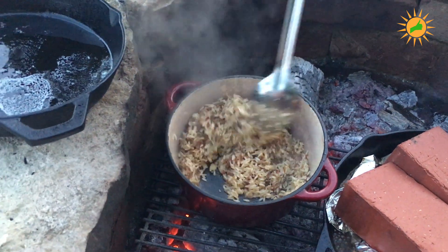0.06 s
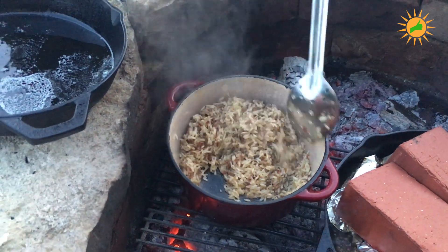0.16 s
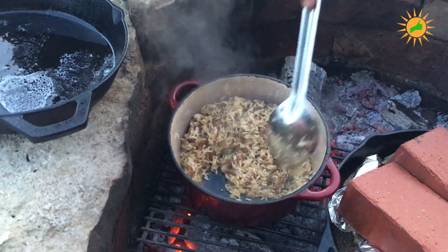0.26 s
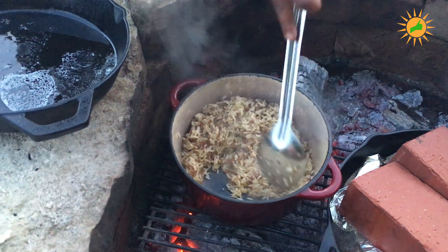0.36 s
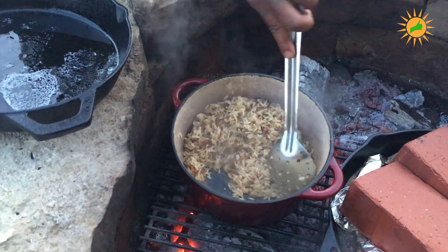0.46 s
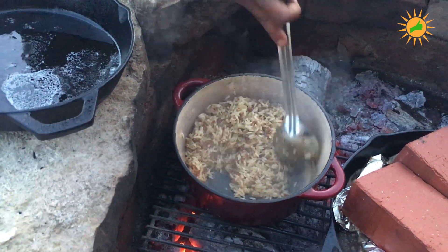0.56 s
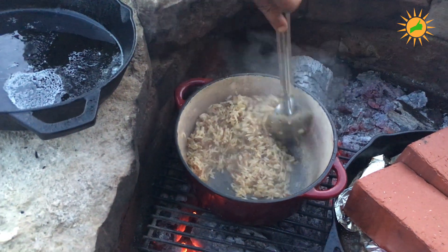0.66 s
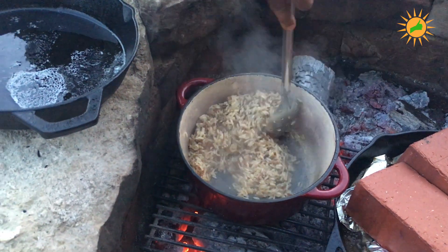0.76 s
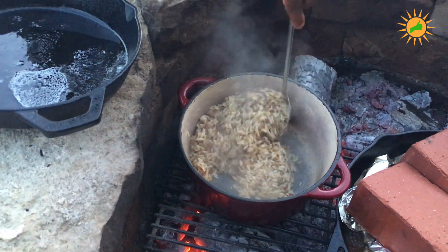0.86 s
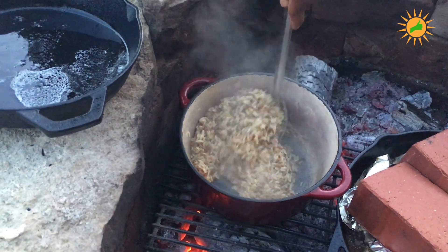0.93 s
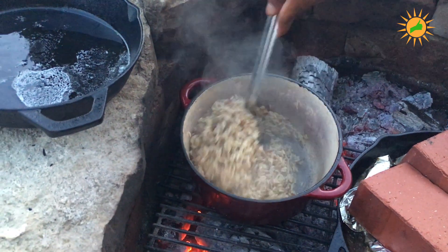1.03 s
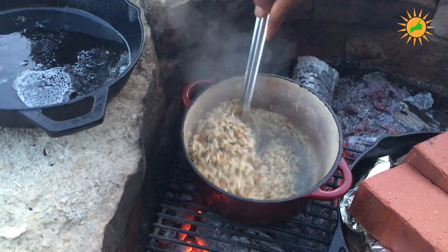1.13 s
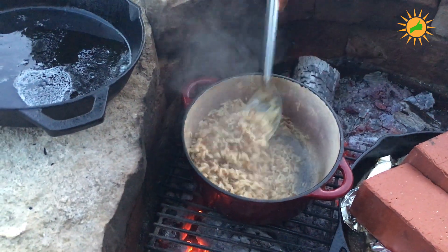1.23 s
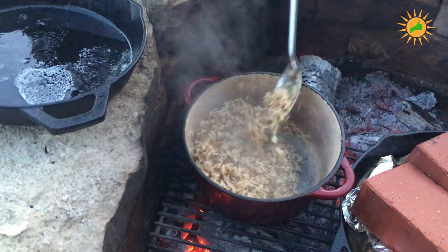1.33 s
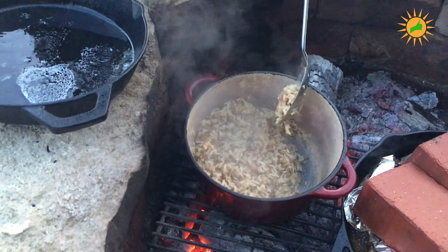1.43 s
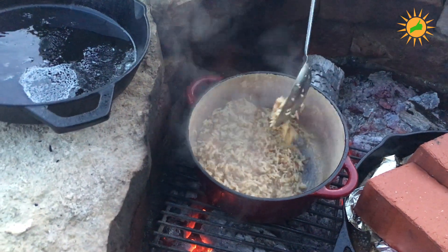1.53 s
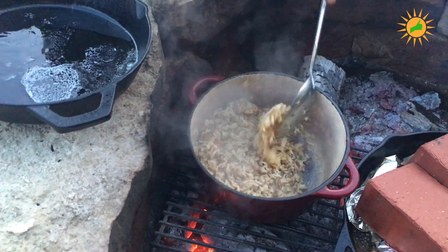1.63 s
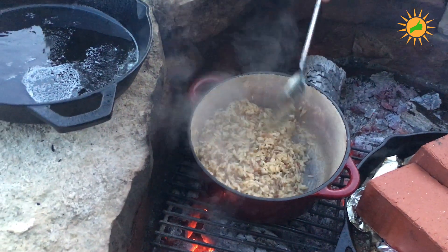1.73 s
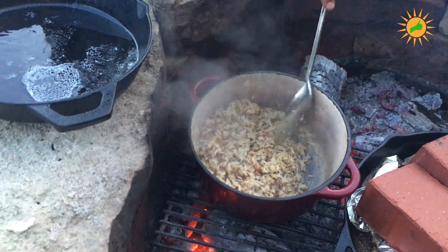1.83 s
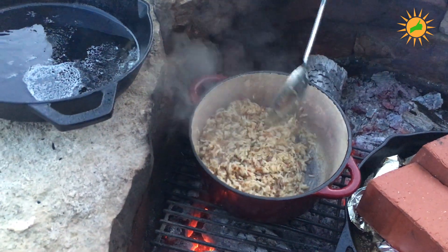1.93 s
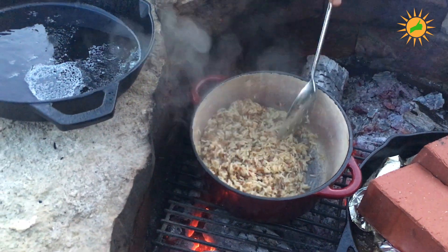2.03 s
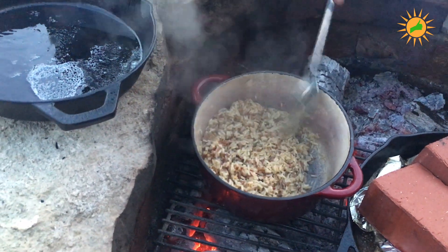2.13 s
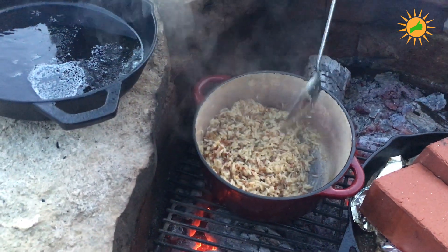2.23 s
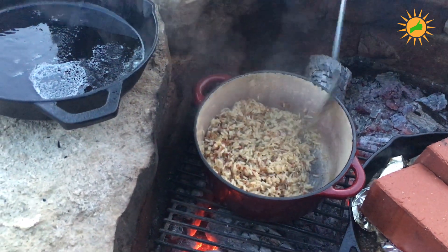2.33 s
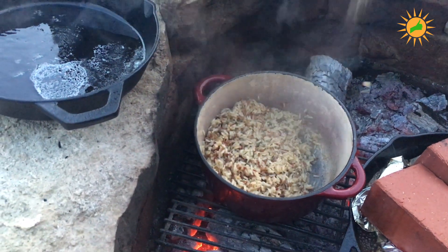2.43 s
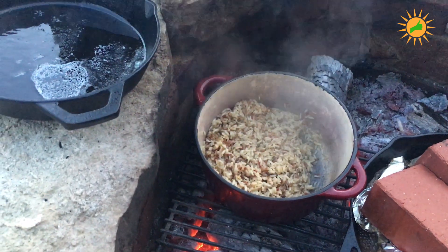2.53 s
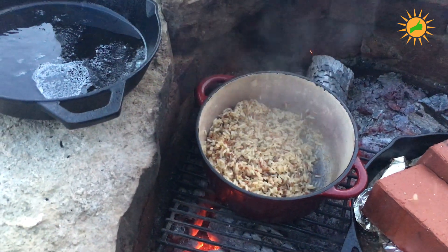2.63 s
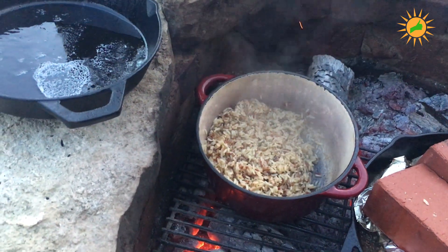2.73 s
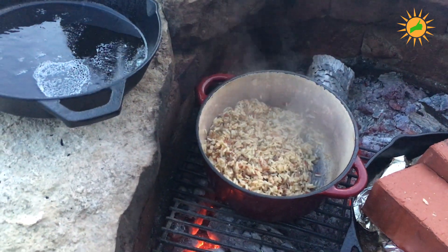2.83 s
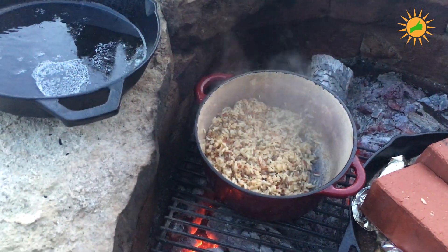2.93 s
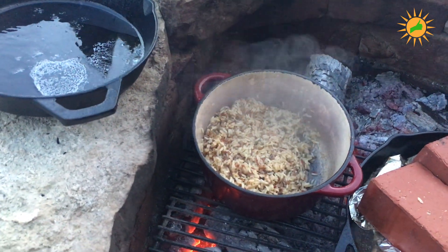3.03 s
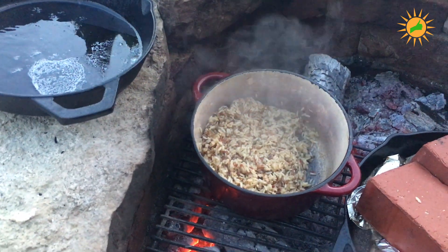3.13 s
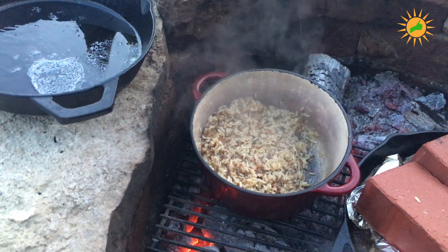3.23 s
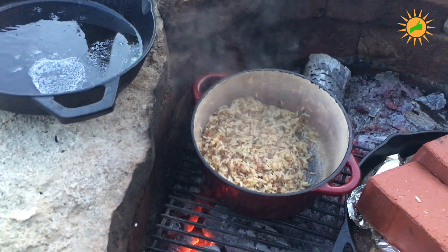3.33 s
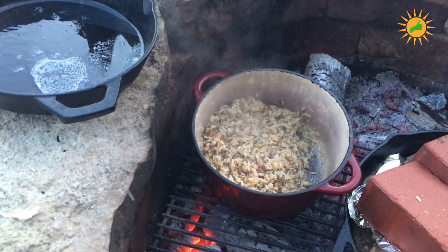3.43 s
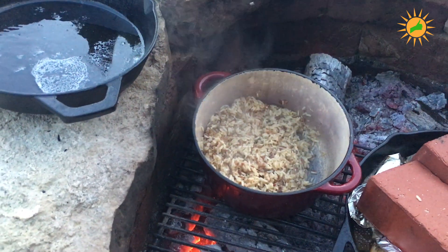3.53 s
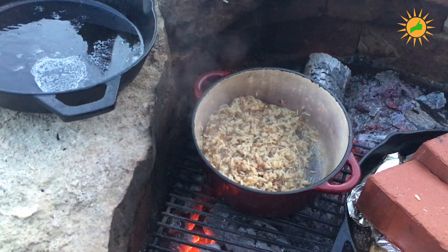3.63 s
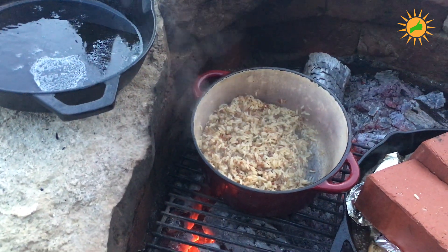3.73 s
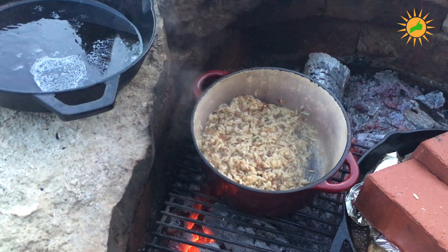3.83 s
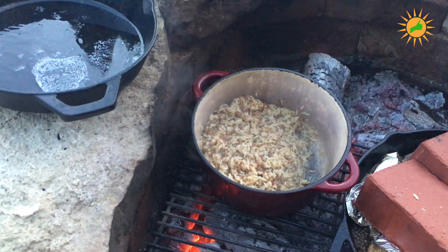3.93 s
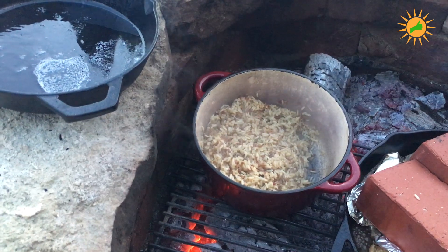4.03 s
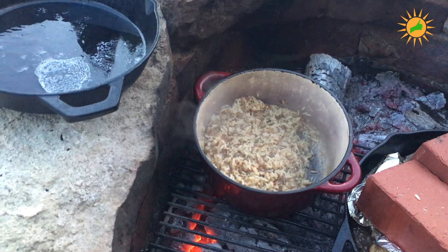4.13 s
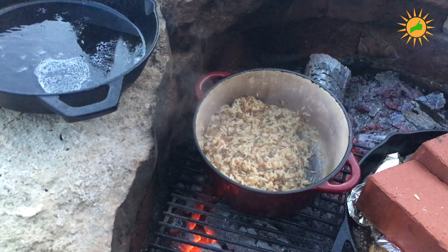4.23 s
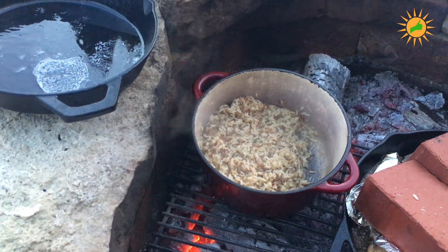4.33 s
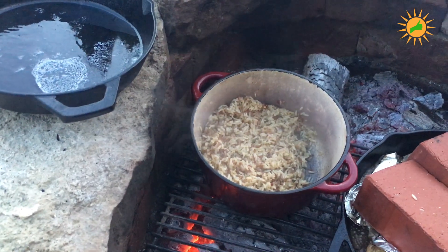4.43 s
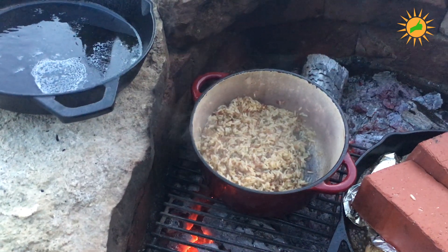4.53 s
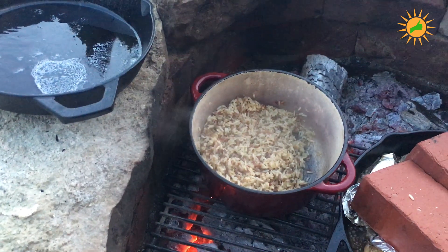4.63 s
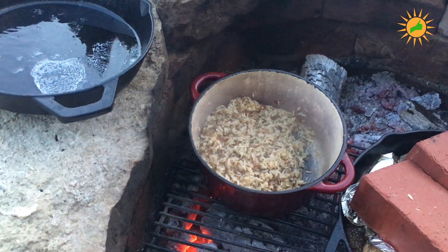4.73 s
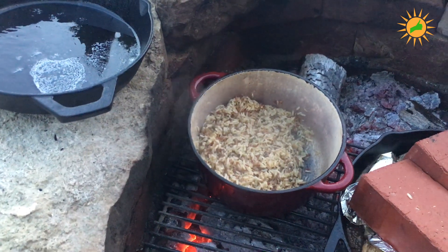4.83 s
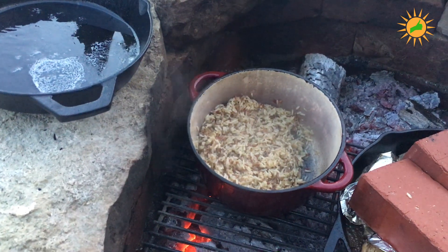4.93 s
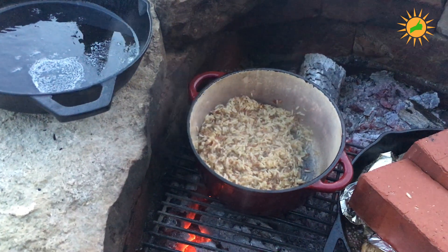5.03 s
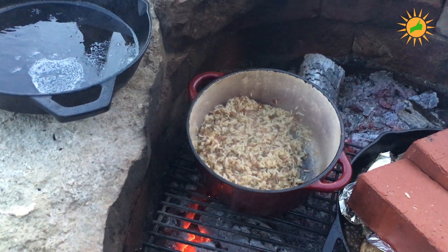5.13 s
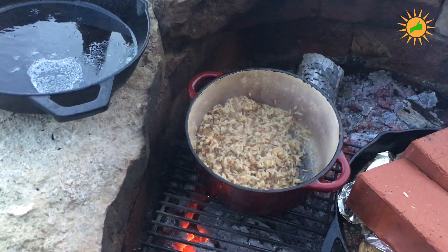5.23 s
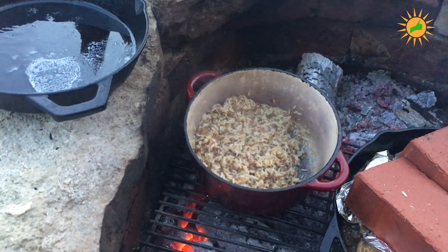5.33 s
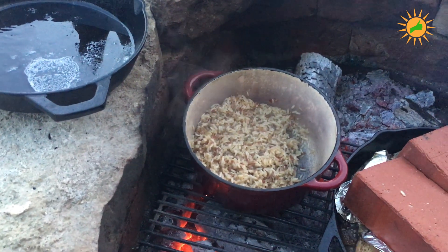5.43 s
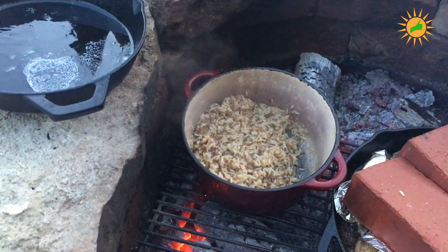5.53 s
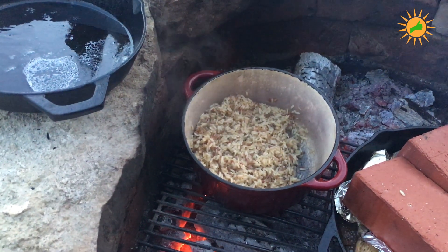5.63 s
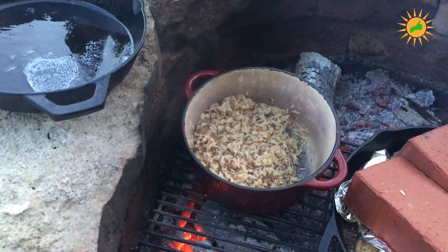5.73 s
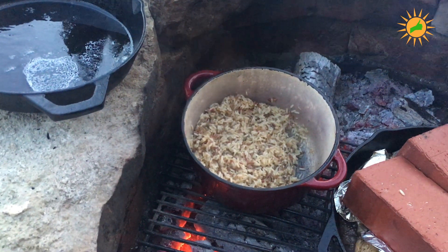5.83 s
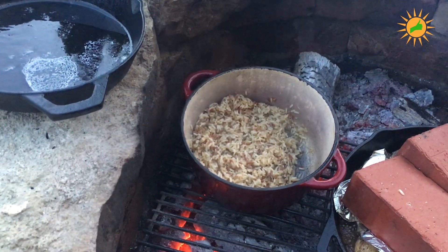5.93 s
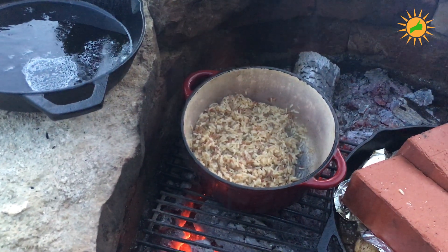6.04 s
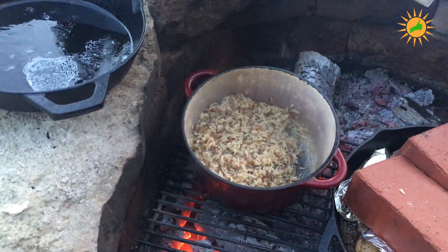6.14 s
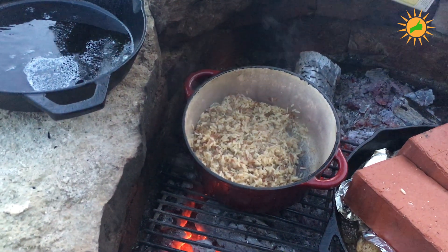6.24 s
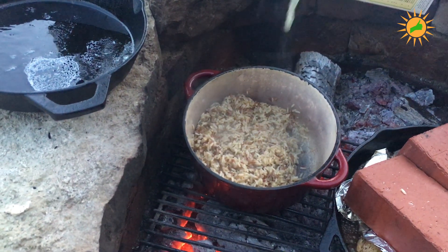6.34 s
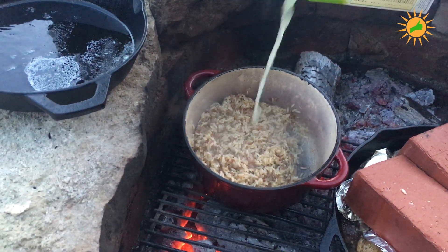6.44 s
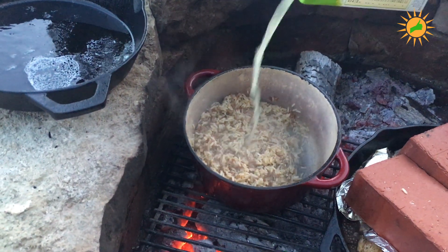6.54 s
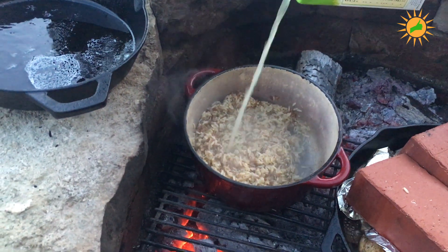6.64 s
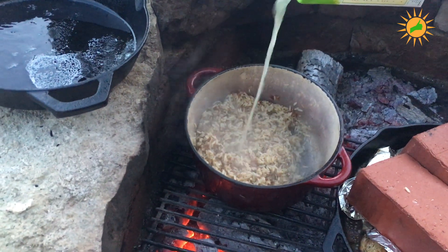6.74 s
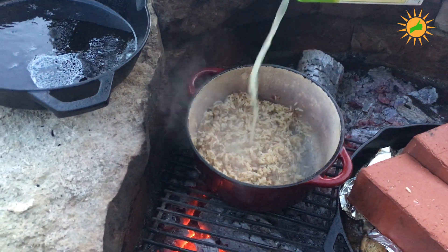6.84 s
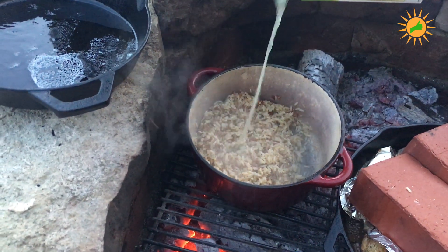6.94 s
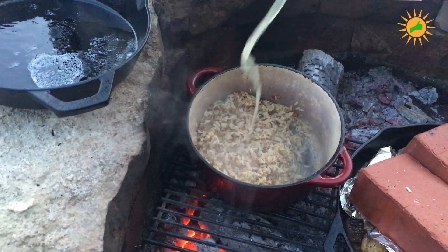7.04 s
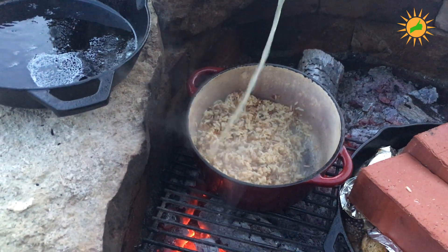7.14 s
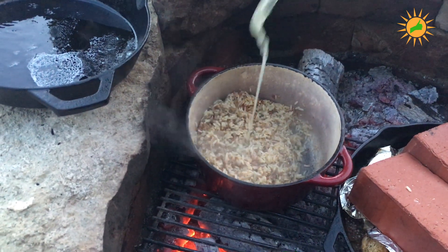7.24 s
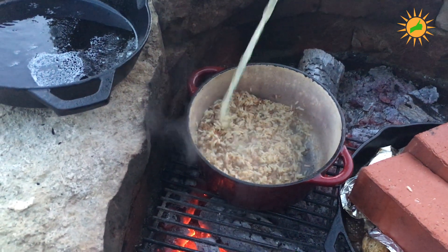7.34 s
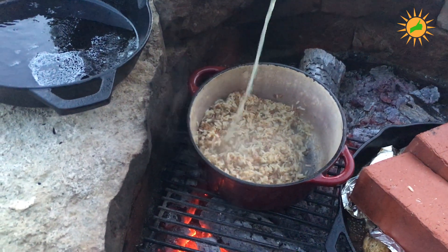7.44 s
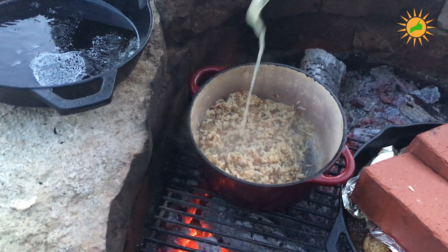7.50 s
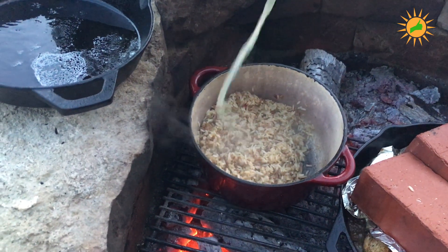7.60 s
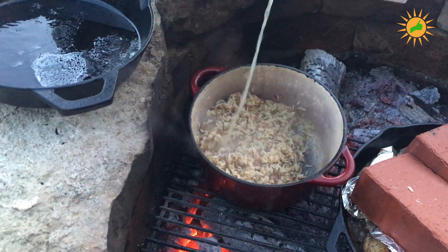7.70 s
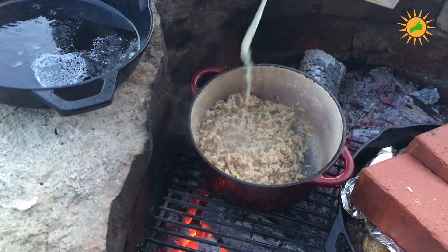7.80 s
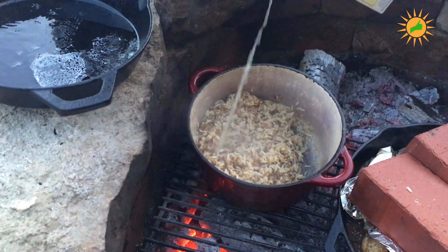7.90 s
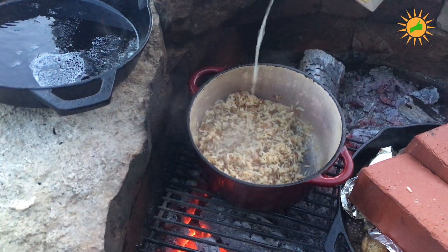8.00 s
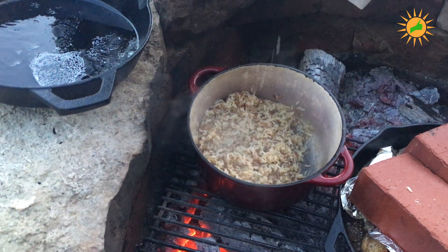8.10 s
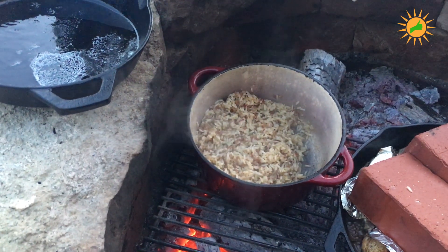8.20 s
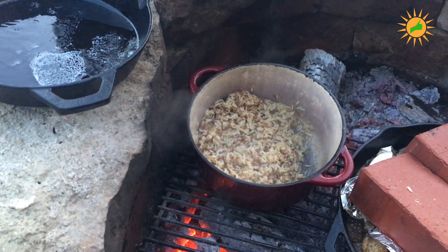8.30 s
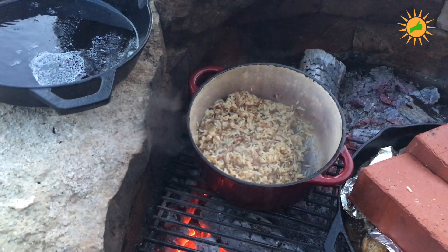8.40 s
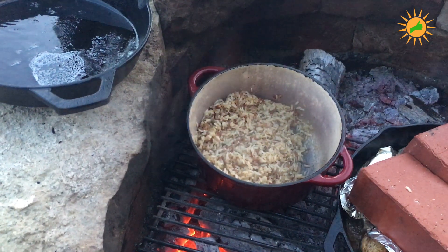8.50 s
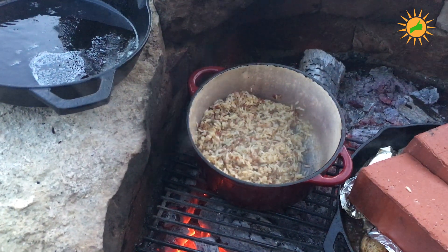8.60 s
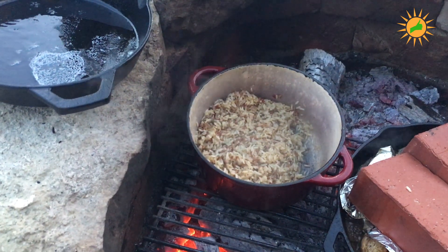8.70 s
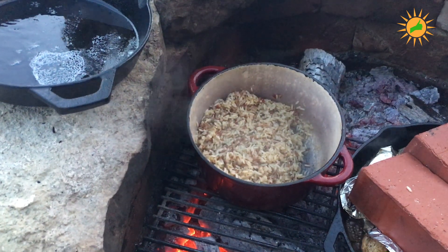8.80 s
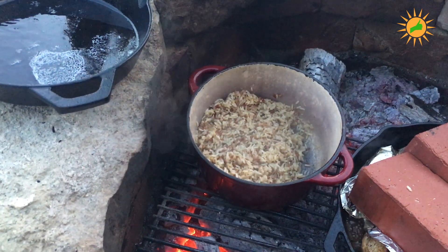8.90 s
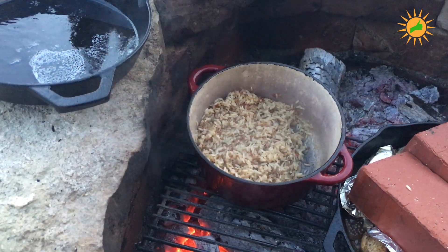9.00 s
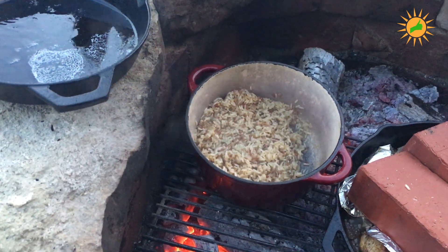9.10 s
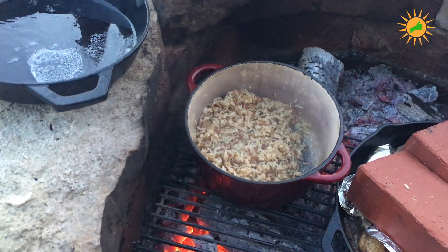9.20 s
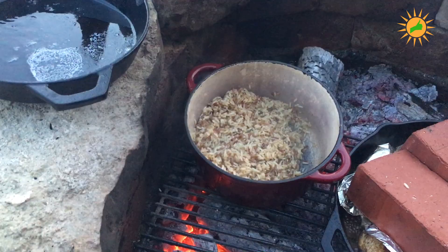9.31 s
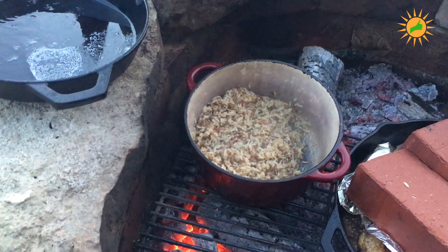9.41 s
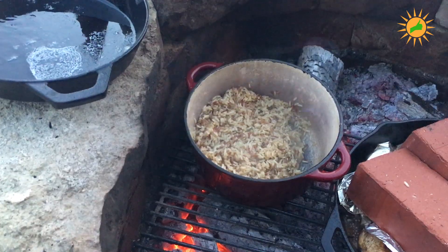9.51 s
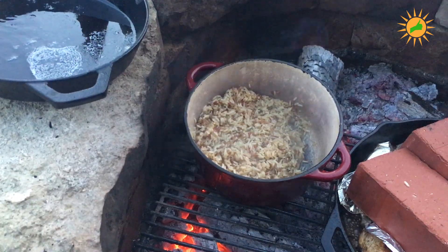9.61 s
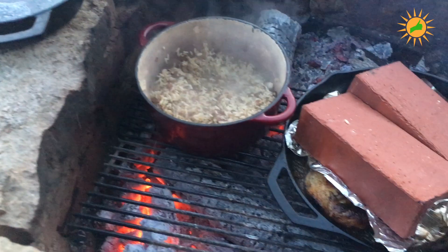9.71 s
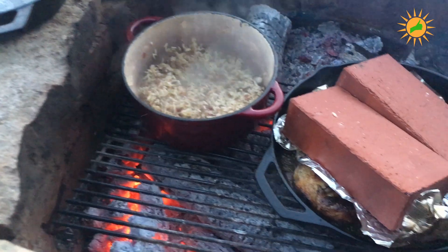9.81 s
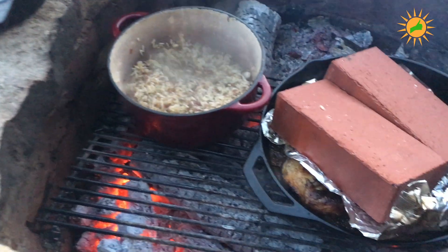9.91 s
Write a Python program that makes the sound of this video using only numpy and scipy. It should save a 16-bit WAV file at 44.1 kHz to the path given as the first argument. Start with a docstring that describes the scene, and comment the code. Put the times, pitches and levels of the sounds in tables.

```python
"""Rice sizzles in a cast-iron pot over coals in a stone fire pit, outdoors, while far traffic rumbles.
A steel spoon clinks in, scrapes through the rice and is knocked clean on the pot five times; frying goes on
with small pops of fat and one last faint clink. Far off, one engine drones and another slowly speeds up.
Frying, scraping and road are shaped noise and grains; blows are damped modes plus contact noise;
engines are sums of sine orders."""
import sys
import numpy as np
from scipy import signal
from scipy.fft import rfft, irfft, next_fast_len
from scipy.io import wavfile
from scipy.ndimage import uniform_filter1d, map_coordinates

SR = 44100
rng = np.random.default_rng(int(sys.argv[2]) if len(sys.argv) > 2 else 0)


def to_wav(sig):
    """Store sig (one row per channel, or 1-D mono) as 16-bit WAV at the path in sys.argv[1].

    Samples outside -1..1 are clipped; the rate is SR.
    """
    pcm = np.clip(np.atleast_2d(sig), -1, 1) * 32767
    pcm = np.round(pcm).astype(np.int16)
    wavfile.write(sys.argv[1], SR, pcm.T)  # frames by channels


N = 439236
TOP_HZ = 15900  # upper band limit

# contact noise spectrum: (frequency [Hz], density [dB per Hz])
CLASH = [(80, -11), (400, -4), (900, 5), (2000, -1), (3000, -1.5), (5000, 1), (9000, -5), (10300, -6.5),
         (11500, -7.5), (15500, -12)]


def amp(db):
    """Decibels to gain."""
    return 10 ** (np.asarray(db) / 20)


def unit(x):
    """Scale to rms 1."""
    return x / np.sqrt(np.mean(x ** 2) + 1e-20)


def along(points, hz):
    """Read (Hz, value) points on a log axis."""
    f, v = np.transpose(points)
    return np.interp(np.log(hz + 1), np.log(f + 1), v)


def curves(rows):
    """One value per sample for each column after the time."""
    s, *cols = np.transpose(rows)
    return [np.interp(np.arange(N) / SR, s, c) for c in cols]


def wobble(rate):
    """A smooth random curve, rate knots a second."""
    return map_coordinates(rng.standard_normal(int(N * rate / SR) + 4), [np.arange(N) * rate / SR])


def filtered(x, response):
    """x times a response of frequency."""
    m = next_fast_len(len(x) + SR // 4)
    return irfft(rfft(x, m) * response(np.fft.rfftfreq(m, 1 / SR)), m)[:len(x)]


def add(track, s, sound):
    """Mix a sound into the track at time s."""
    part = track[round(s * SR):][:len(sound)]
    part += sound[:len(part)]


def fade(t, t60):
    """Exponential decay, 60 dB down at t60."""
    return np.exp(-np.log(1000) * t / t60)


def swell(start, length, rise, release):
    """Envelope: a straight rise, a hold until length is over, an exponential release."""
    t = np.arange(N) / SR - start
    return np.clip(t / rise, 0, 1) * np.exp(-np.maximum(t - length, 0) / release)


def grains(rate, spread_db, share):
    """Random impulses of log-normal, capped size over the hiss of countless smaller ones."""
    sizes = amp(spread_db * np.minimum(rng.standard_normal(N), 2.8))
    clicks = (rng.random(N) < rate / SR) * sizes * rng.choice([-1, 1], N)
    share = np.clip(share, 0, 1)  # of the power
    return np.sqrt(share) * unit(clicks) + np.sqrt(1 - share) * rng.standard_normal(N)


def hollow_db(hz):
    """Peaks and dips that the pot's hollow gives to sounds inside it."""
    # air in the pot: (centre [Hz], width [Hz], gain [dB])
    air_modes = [(443, 118, -7), (600, 140, 1.5), (780, 120, -1), (924, 105, 2.5), (1120, 84, -1),
                 (1362, 230, 5), (1774, 280, 4), (4840, 170, -5)]
    return sum(db / (1 + (2 * (hz - centre) / width) ** 2) for centre, width, db in air_modes)


def rumble():
    """Steady low road noise; near the end a further low rumble swells in."""
    # road spectrum: (frequency [Hz], density [dB per Hz])
    road_spectrum = [(20, -24), (35, -14.5), (53, 2.5), (80, -2.5), (110, 0.5), (150, -10), (200, -11),
                     (260, -14), (330, -25), (480, -30.5), (900, -58)]
    road_db = -52
    swell_s, swell_rise_s, swell_db = 9.6, 0.33, -51.5
    level = np.hypot(amp(road_db), amp(swell_db) * swell(swell_s, 1, swell_rise_s, 1))
    noise = filtered(rng.standard_normal(N), lambda hz: amp(along(road_spectrum, hz)))
    return level * unit(noise)


def engine(hz, db, orders, colour):
    """A few orders of a far engine, each fading in and out on its way through the air."""
    phase = 2 * np.pi * np.cumsum(hz * (1 + 0.002 * wobble(6))) / SR
    out = np.zeros(N)
    for k in orders:
        level_db = db + along(colour, k * hz) + 1.0 * wobble(5)
        out += np.sqrt(2) * amp(level_db) * np.sin(k * phase)
    return out


def traffic():
    """Two far engines: one drones and sags a little, the other pulls up to speed and lets off."""
    # drone overtones before muffler: (time [s], level [dB])
    overtone_levels = [(0, -55.5), (1.3, -56), (1.7, -66), (7, -68.5), (8.5, -61), (9.96, -69)]
    # climbing engine's pipe colour: (frequency [Hz], gain [dB])
    exhaust = [(122, -16), (133, -1), (150, 2), (157, -13.5), (240, -14.5), (248, -6.5), (263, -7),
               (272, -21), (295, -12), (305, -10), (323, -11.5), (335, -16)]
    muffler = [(110, 0), (225, -1.5), (335, -14)]  # (frequency [Hz], gain [dB])
    t = np.arange(N) / SR

    firing_hz, firing_db = 113, -63
    sag_hz_per_s, sag_start_s = 0.75, 3.5
    drone_hz = firing_hz - sag_hz_per_s * np.maximum(t - sag_start_s, 0)
    drone = engine(drone_hz, firing_db, (1,), muffler)
    drone += engine(drone_hz, curves(overtone_levels)[0], (2, 3), muffler)

    open_s, close_s, throttle_fade_s, climb_db = 2.95, 7.45, 0.3, -56
    cycle_hz, gain_hz_per_s, ease_hz_per_s2 = 23.85, 2.35, 0.19
    pulling_s = np.clip(t, open_s, close_s) - open_s
    climb_hz = cycle_hz + gain_hz_per_s * pulling_s - ease_hz_per_s2 * pulling_s ** 2 / 2
    throttle = swell(open_s, close_s - open_s, throttle_fade_s, throttle_fade_s / 2)
    return drone + throttle * engine(climb_hz, climb_db, (5, 8, 10), exhaust)


def frying_db():
    """Strength of the frying: the rice's own, plus a flare of hiss when the spoon turns wet rice onto hot iron."""
    # frying left alone, before offset: (time [s], fine spray level [dB])
    own_frying = [(2.46, -54.5), (2.67, -51.5), (2.9, -55.5), (3.06, -48.5), (3.4, -54.5), (3.8, -48.5),
                  (4.05, -54.0), (4.74, -51.5), (4.85, -55.5), (5.04, -51.0), (5.26, -51.0), (5.39, -57.5),
                  (5.81, -49.5), (5.92, -53.0), (6.25, -50.5), (7.0, -53.0), (7.39, -49.5), (7.68, -55.0),
                  (8.47, -50.0), (8.77, -57.0), (8.87, -51.5), (9.32, -58.0), (9.42, -55.0), (9.65, -56.5),
                  (9.73, -52.0), (9.94, -54.0)]
    # stirs: (start [s], length [s], hiss level [dB])
    stirs = [(-0.1, 0.078, -49), (0.37, 0.094, -53), (0.555, 0.17, -41.5), (0.86, 0.26, -46.5),
             (1.28, 0.11, -49.5), (1.95, 0.11, -52)]
    own_offset_db = -0.28
    rise_s, dry_s = 0.07, 0.11  # dry_s: time constant as the iron dries
    own_db, = curves(own_frying)
    flares = sum((amp(db) * swell(s, length, rise_s, dry_s)) ** 2 for s, length, db in stirs)
    return 10 * np.log10(amp(own_db + own_offset_db) ** 2 + flares)


def patchy(x, depth_db):
    """Different corners of the pan flare in turn, so the colour of the hiss keeps shifting."""
    z = signal.stft(x, nperseg=256)[2]
    field = rng.standard_normal(z.shape)
    for _ in range(2):
        field = uniform_filter1d(field, size=12, axis=0)  # frequency
        field = uniform_filter1d(field, size=10, axis=1)  # time
    return signal.istft(z * amp(depth_db * unit(field)), nperseg=256)[1][:N]


def crackle(level_db, rate, grain_db, spread_db, pitch_hz, octaves, cycles):
    """Droplets, each bursting at its own pitch: harder frying makes more of them, not larger ones."""
    density = rate * amp(level_db - np.median(level_db)) ** 1.5  # per second
    starts = np.flatnonzero(rng.random(N) < density / SR)
    size, pitch, sign = rng.standard_normal((len(starts), 3)).T[:, :, None]
    hz = np.clip(pitch_hz * 2 ** (octaves * pitch), 1300, 15000)
    age = np.arange(SR // 300)  # samples
    bursts = np.sign(sign) * amp(grain_db + spread_db * np.minimum(size, 2.4))
    bursts = bursts * np.sin(2 * np.pi * hz * age / SR) * fade(age / SR, cycles / hz)
    ticks = np.bincount((starts[:, None] + age).ravel(), bursts.ravel(), N)[:N]
    return filtered(ticks, lambda f: amp(hollow_db(f)) * f / np.hypot(f, 700))


def sizzle():
    """Steam bubbles burst among the grains in little flurries; fat on bare iron sprays finer and brighter."""
    # bubbling spectrum: (frequency [Hz], density [dB per Hz])
    simmer_spectrum = [(180, -17), (300, -3.5), (446, -3), (590, 0), (756, -3), (907, -1.5), (1120, -3),
                       (1390, -2), (2320, -1.5), (4070, -5.5), (4880, -8.5), (9290, -12), (10400, -18),
                       (11700, -10.5), (15500, -6)]
    # fat spray spectrum: (frequency [Hz], density [dB per Hz])
    spray_spectrum = [(1200, -30), (2500, 0), (4000, 1.5), (4900, -0.5), (6000, 2.5), (7800, -2.5),
                      (9200, 0), (10300, -7), (11500, -3.5), (15500, -10.5)]
    usual_simmer_db, simmer_db_per_spray_db = -52, 0.35

    spray_db = frying_db() + 0.4 * wobble(8)
    simmer_db = usual_simmer_db + simmer_db_per_spray_db * (spray_db - np.median(spray_db))
    flurry = wobble(45)

    def simmer_response(hz):
        return amp(along(simmer_spectrum, hz) + hollow_db(hz)) / np.hypot(1, hz / 4500)

    simmer = filtered(grains(rate=1000, spread_db=5.5, share=0.54), simmer_response)
    fizz_db = spray_db + 1.0 * flurry + 0.5 * wobble(14)
    fizz = grains(rate=7000, spread_db=5.0, share=0.88)
    fizz = patchy(filtered(fizz, lambda hz: amp(along(spray_spectrum, hz))), depth_db=1.5)
    # many small droplets, and now and then a larger, brighter one
    droplets = crackle(fizz_db, rate=400, grain_db=-47, spread_db=3.0, pitch_hz=5000, octaves=0.7, cycles=3.0)
    spits = crackle(spray_db / 2, rate=18, grain_db=-32, spread_db=2.5, pitch_hz=8000, octaves=0.6, cycles=9)
    simmer = unit(simmer) * amp(simmer_db + 1.0 * flurry)
    fizz = unit(fizz) * amp(fizz_db - 1.5)
    return simmer + fizz + droplets + spits


def ring(modes, t, length, lift_db, scatter_db):
    """Damped modes, each at a slightly new strength for every blow."""
    hz, db, t60 = np.transpose(modes)[:, :, None]
    gain = amp(db + lift_db(hz) + scatter_db * rng.standard_normal(hz.shape))
    tones = np.sin(2 * np.pi * (hz * t + rng.random(hz.shape)))
    return np.sum(gain * fade(t, t60 * length) * tones, axis=0)


def overtones(count, db, t60):
    """The many weak, closely packed modes that one contact spot wakes in the spoon and the pot wall."""
    hz = rng.uniform(1100, 15500, count)
    life = rng.uniform(0.6, 1.4, count)
    return np.transpose([hz, db + along(CLASH, hz), t60 * life])


def knocks():
    """Each blow chatters for a few milliseconds, rings the steel and thumps the damped pot."""
    # spoon on iron: (time [s], steel [dB], pot [dB], treble tilt [dB per octave],
    #   mode favoured by the contact spot [Hz], its lift [dB], ring length [share of t60])
    blows = [(0.4667, -28, -41, 3.5, 5350, 9, 0.79), (.5008, -31, -37, -0.5, 1820, 25, 0.37),
             (0.9974, -41, -49, -4, 3345, 20, 0.36), (1.695, -20, -14.5, -1, 9280, 12, 0.64),
             (1.7168, -37, -49, -4, 4020, 7, .7), (1.879, -22, -24.5, 0.5, 8406, 31, 0.73),
             (2.034, -20, -14.5, 3, 7190, 2, 0.68), (2.048, -24.5, -36, -0.5, 5340, 6, 0.85),
             (2.2054, -16, -14, 0, 6710, 5, 0.83), (2.3434, -23.5, -16, 3, 7210, 12, 0.96),
             (3.7902, -40.5, -62, 7.5, 12380, 6, 0.82)]
    # spoon and rim: (frequency [Hz], level [dB], full-length t60 [s])
    steel_modes = [(1540, -5, 0.26), (1786, -11, 0.15), (2030, -7, 0.15), (2405, -9.5, 0.12),
                   (3005, -7, 0.13), (3370, -4, 0.13), (4030, 1, 0.14), (4330, -15, .06), (4810, -5, 0.16),
                   (4920, -10, 0.039), (5310, -4.5, 0.14), (6030, -6, 0.09), (6670, -1.5, 0.12),
                   (7160, 2.5, 0.11), (8060, -29, 0.044), (8100, -19, 0.067), (8306, 0, 0.04),
                   (8570, 2.5, 0.066), (9360, 1.5, 0.1), (9980, -0.5, 0.061), (11220, 1, 0.12),
                   (11660, -1, 0.069), (12300, 2, 0.055), (13800, -4, .08), (14930, -7, .08)]
    # pot body: (frequency [Hz], level [dB], t60 [s])
    pot_modes = [(344, -19.5, 0.059), (600, -7, 0.016), (937, -4, 0.047), (986, -14.5, 0.031),
                 (1350, -11, 0.034)]
    out, t = np.zeros(N), np.arange(SR // 4) / SR
    for s, steel_db, pot_db, tilt_db, spot_hz, spot_db, length in blows:
        def tilt(hz):
            return tilt_db * np.log2((hz + 300) / 5000)

        def lift(hz):
            return tilt(hz) + spot_db * np.exp(-((hz - spot_hz) / 130) ** 2)

        main = ring(steel_modes, t, length, lift, scatter_db=2.2)
        dense = ring(overtones(count=70, db=-5.5, t60=0.078), t, length, tilt, scatter_db=3)
        steel = 0.33 * (main + dense)
        steel *= 0.68 + 0.25 * np.exp(-(t / 0.012) ** 2)  # hand and rice soak up the first swing quickly
        noise = unit(filtered(rng.standard_normal(len(t)), lambda hz: amp(along(CLASH, hz) + tilt(hz))))
        clash = noise * (0.86 * fade(t, 0.032) + 0.17 * fade(t, 0.08 * length))
        pot = ring(pot_modes, t, 1, np.zeros_like, scatter_db=1.2)
        onset = 1 - np.exp(-t / 0.0002)
        add(out, s, (amp(steel_db) * (steel + clash) + amp(pot_db) * pot) * onset)
    return out


def pit(x, delay_s=0.015):
    """A short, scattered answer from the stones round the fire."""
    # stone walls' decay: (frequency [Hz], t60 [s])
    wall_t60 = [(200, 0.057), (1500, 0.08), (6000, 0.064), (15000, 0.046)]
    hz, t, z = signal.stft(rng.standard_normal(SR // 4), SR, nperseg=128)
    tail = signal.istft(z * fade(t, along(wall_t60, hz)[:, None]), SR, nperseg=128)[1]
    delayed = np.pad(x, (round(delay_s * SR), 0))
    return signal.fftconvolve(delayed, tail / np.linalg.norm(tail))[:N]


def scrape():
    """The spoon's edge sticks and slips over iron and rice, exciting the pot."""
    # drags over the bottom: (hardest push [s], level [dB], rise [s], fall [s])
    drags = [(0.61, -45, 0.038, 0.082), (1.038, -32.5, 0.038, 0.033)]
    # resonances driven by the edge: (centre [Hz], width [Hz], level [dB])
    scraped_modes = [(603, 110, -6.5), (996, 66, 5), (1640, 160, -3), (1970, 160, -2), (2970, 410, -5),
                     (4100, 120, -3), (5170, 1100, -13), (7000, 860, -22)]
    t = np.arange(N) / SR
    pressure = np.zeros(N)
    for s, db, rise, fall in drags:
        pressure += amp(db) * np.exp(-np.maximum((s - t) / rise, (t - s) / fall))

    def body(f):
        total = 0
        for k, (centre, width, db) in enumerate(scraped_modes):
            damping = 1j * f * width
            total = total + (-1) ** k * amp(db) * damping / (centre * centre - f * f + damping)
        return total

    slips = grains(rate=650, spread_db=3, share=0.81) * amp(1.7 * wobble(140))
    return unit(filtered(slips, body)) * pressure


def pops():
    """A larger drop of fat bursts with one sharp snap and leaves a brief spit in the pot."""
    # largest drops: (time [s], peak [dB], treble tilt [dB per octave])
    large = [(1.101, -27, 9), (1.292, -27.5, -2), (1.326, -23, 2), (1.443, -26.5, 3), (2.141, -29, -2),
             (3.001, -27, 11), (3.466, -30.5, -2), (3.913, -26, 1), (5.012, -29.5, -2), (7.433, -28, -0.5),
             (7.875, -34.5, -7), (8.408, -29, 4), (8.483, -27, 3), (8.568, -28, 2.5), (8.903, -30, 7),
             (9.769, -28, 0)]
    small_per_s, small_db, small_tilt_db = 1.2, -37.5, 5  # mean peak, mean tilt per octave
    out, t = np.zeros(N), np.arange(SR // 30) / SR
    times = np.flatnonzero(rng.random(N) < small_per_s / SR) / SR
    draws = rng.standard_normal((len(times), 2))
    small = [(s, small_db + 2 * size, small_tilt_db + 2 * bright) for s, (size, bright) in zip(times, draws)]
    lead = SR // 500  # samples of room ahead of the snap for the zero-phase filter
    for s, db, tilt_db in large + small:
        burst = rng.standard_normal(len(t)) * (0.29 * fade(t, 0.0087) + 0.061 * fade(t, 0.034))
        burst[0] = 1

        def colour(hz):
            tilt = tilt_db * np.log2((hz + 800) / 5000)
            return amp(along(CLASH, hz) * 0.5 + hollow_db(hz) + tilt) * (hz < TOP_HZ)

        snap = filtered(np.pad(burst, (lead, 0)), colour)
        add(out, s - lead / SR, amp(db) * snap / np.abs(snap).max())
    return out


def grate(s=2.2058):
    """The hardest blow pushes the pot down on its grate: three short low modes."""
    out, t = np.zeros(N), np.arange(SR // 4) / SR
    for hz, db, t60 in [(92, -28.0, 0.048), (166, -27.0, 0.041), (250, -30, 0.021)]:
        add(out, s, amp(db) * np.sin(2 * np.pi * hz * t) * fade(t, t60))
    return out


def scene():
    """The pot close by, the road far away."""
    spoon = knocks() + grate()
    spoon_in_pit = spoon + amp(-15.0) * pit(spoon)
    return (rumble() + traffic() + sizzle() + spoon_in_pit + scrape() + pops())[None]


def record(dry):
    """Cut the deepest bass and, steeply, everything above the band limit."""
    dry = signal.sosfilt(signal.butter(3, 42, "highpass", fs=SR, output="sos"), dry)
    return np.array([filtered(channel, lambda hz: 1 / np.sqrt(1 + (hz / TOP_HZ) ** 160)) for channel in dry])


dry = scene()
out = record(dry)
to_wav(out)
```